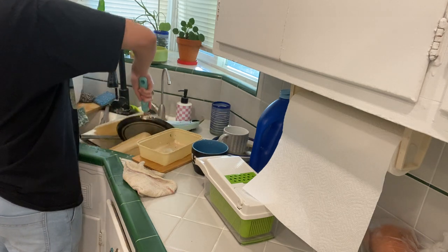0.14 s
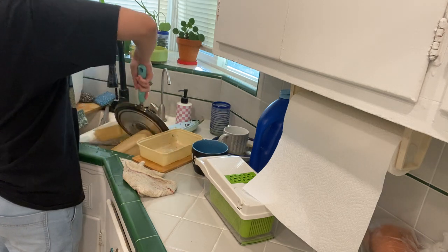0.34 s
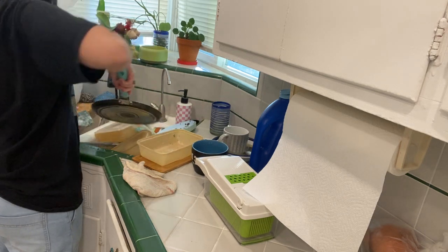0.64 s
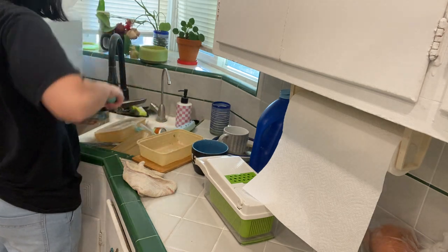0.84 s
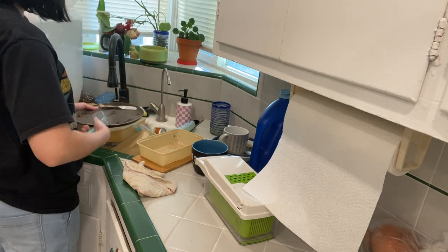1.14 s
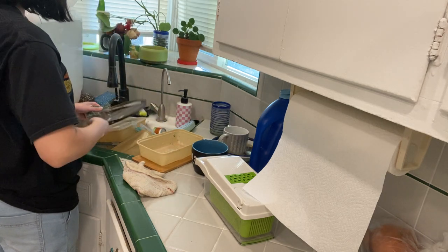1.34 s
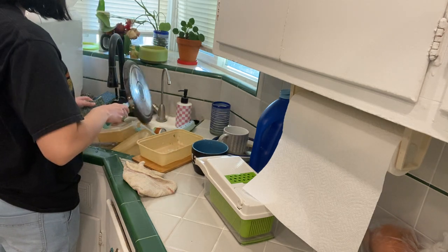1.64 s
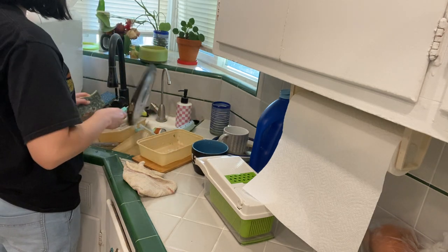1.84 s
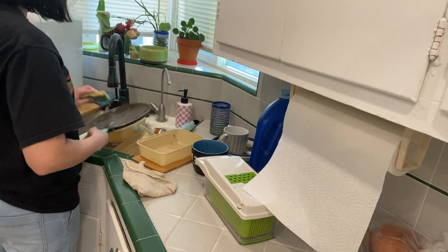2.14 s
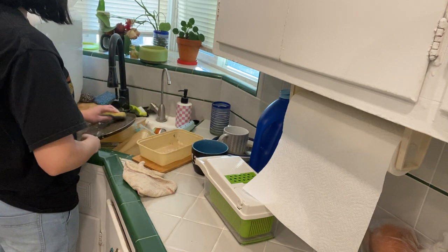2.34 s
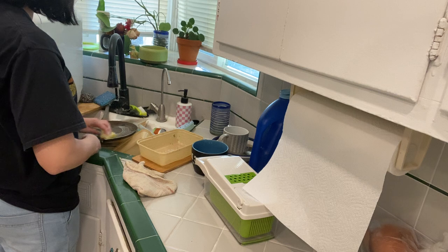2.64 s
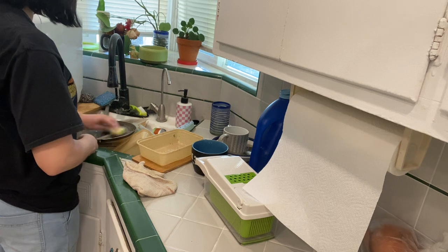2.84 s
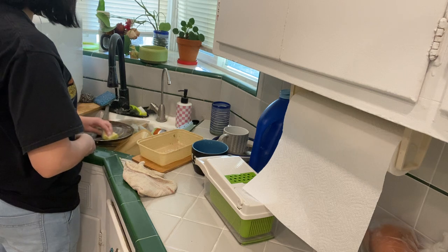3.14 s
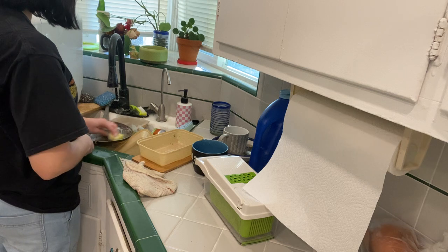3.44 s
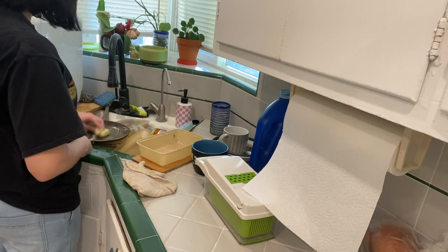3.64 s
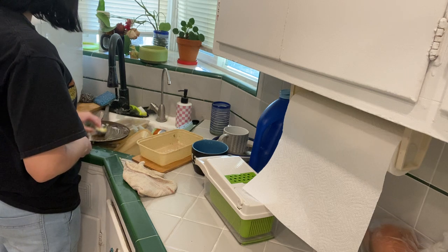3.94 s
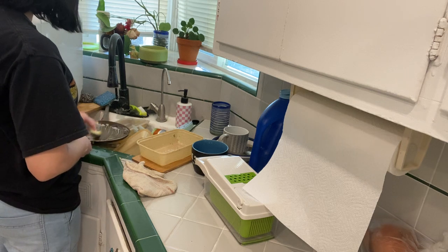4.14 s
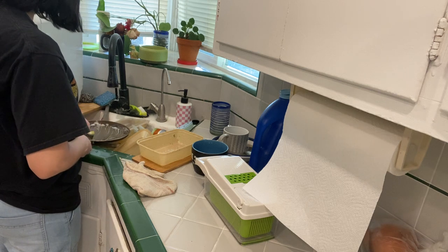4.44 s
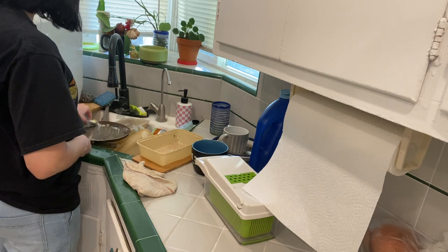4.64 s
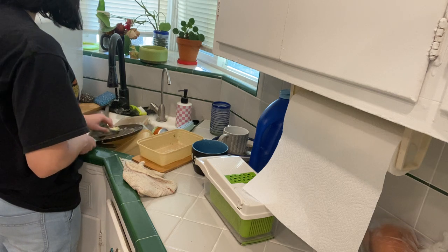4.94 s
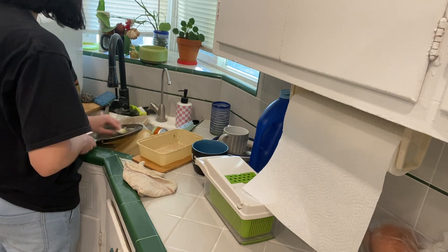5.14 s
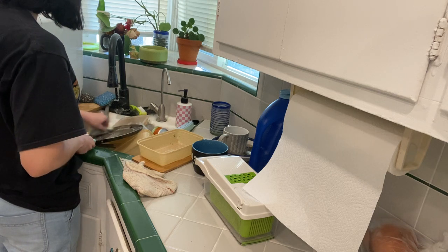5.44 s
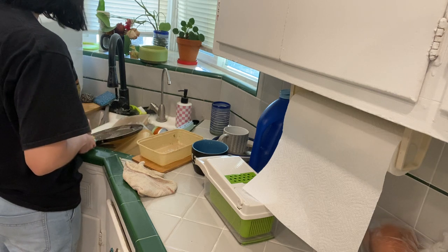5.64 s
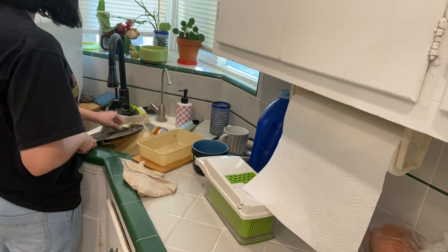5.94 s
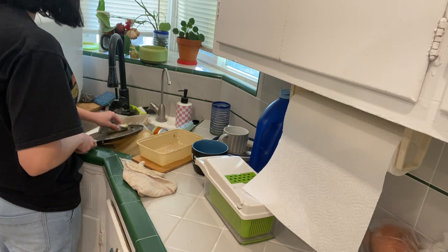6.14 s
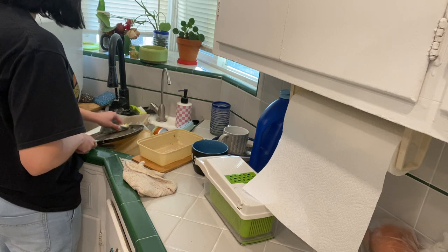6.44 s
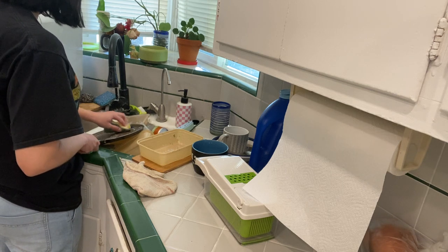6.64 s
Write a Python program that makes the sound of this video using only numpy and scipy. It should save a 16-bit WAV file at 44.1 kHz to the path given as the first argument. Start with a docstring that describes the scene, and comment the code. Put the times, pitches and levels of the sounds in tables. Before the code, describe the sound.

Loud, irregular washing-up clatter comes first: gritty scraping, a ringing dish clink, dull basin thuds and metallic pan clanks with short rings. Then the pan is held and scrubbed with a wet foamy sponge, several short hissing strokes per second over faint low rumbles. Occasional small knocks get quieter. Heard from over a metre away in a reflective kitchen, with a low steady background rush.

```python
"""In a tiled kitchen a thin round metal pan is dragged out of the sink, knocks against crockery and
the basin, and is scrubbed with a soapy sponge in short strokes.
Blows are bursts of filtered noise that set decaying modes ringing; scrapes and foam are trains of tiny
grains, and squeaks are short tones with two overtones.
A two-port phone on the counter, over a metre away, hears the contacts mostly by way of the room."""
import sys
import numpy as np
from scipy import signal
from scipy.fft import rfft, irfft
from scipy.io import wavfile
from scipy.ndimage import uniform_filter1d

SR = 44100
rng = np.random.default_rng(int(sys.argv[2]) if len(sys.argv) > 2 else 0)


def transcribe(u):
    """Save the signal u as a 16-bit wav file named by the first command-line argument.

    u: samples, shape (n,) or (channels, n), limited to [-1, 1]; the rate is SR.
    q: integer samples, one column per channel.
    """
    v = np.clip(np.atleast_2d(u).T, -1, 1)
    q = np.round(v * 32767).astype(np.int16)
    wavfile.write(sys.argv[1], SR, q)


N = 299512
T = np.arange(N) / SR  # s
HZ = np.maximum(np.arange(N // 2 + 1) * SR / N, 1)

# Blows on the pan, before the balance set in scene(); thud_db, crack_db and ring_db relative to level_db:
# start_s, level_db, thud_db, crack_db, ring_db, chatter_s, place (0 rim - 1 face)
PAN_BLOWS = [(0.814, -27, -16.5, -4, -14, 0.0096, 0.089), (0.891, -27, -0.5, -16, -9, 0.019, 0),
             (1.471, -51, -26, 14, 13.5, 0.0054, 0.26), (1.496, -48.5, -7.5, 11.5, 15.5, 0.0098, 0.19),
             (2.295, -16.5, 7, 5, -2, 0.0029, 0.21), (2.361, -23.5, 4.5, -6, -0.5, 0.0038, 0),
             (3.539, -18.5, 2, 2, -3.5, 0.003, 1)]
# Bumps against the basin and its edge, with a drip at 1.13 s and a short scrape at 1.937 s made the
# same way; before the balance set in scene(), thud_db and crack_db relative to level_db:
# start_s, level_db, thud_db, crack_db
BASIN_CONTACTS = [(0.219, -33, 12, -28), (0.31, -22, -1.5, -6), (0.396, -20, -21, 5),
                  (0.444, -32, 11.5, -4), (0.586, -43.5, 12, 2), (1.13, -57.5, -4.5, 13.5),
                  (1.601, -27.5, 12, 7.5), (1.633, -24, 11, -7.5), (1.695, -17.5, 3, -9.5),
                  (1.729, -18, 0, -12), (1.762, -13.5, -10.5, -0.5), (1.9, -21.5, -5.5, -6.5),
                  (1.937, -19.5, -7.5, 7.5), (2.528, -20.5, -2.5, -0.5), (2.572, -26.5, 5, 4),
                  (2.59, -31.5, 5, -24), (3.007, -38.5, 4.5, 7), (3.039, -31, -2.5, -6),
                  (3.356, -54.5, 11, 7), (3.464, -40, 7.5, -17), (3.951, -45, -2.5, -9),
                  (4.228, -50, 3.5, 6), (4.447, -43.5, -12, -23), (4.704, -33.5, -13, -11),
                  (4.745, -34.5, 8.5, -1.5), (4.895, -38.5, 4.5, 0), (5.502, -45, -1, -23),
                  (5.817, -52.5, 9, -11), (6.329, -60.5, 14.5, -11), (6.647, -62, 9.5, -13),
                  (6.749, -57, 16, -4)]
# Modes of the free pan: pitch_hz, rim_db (struck at the rim), face_db (struck on the face), t60_s
PAN_MODES = [(540, 1, -3, .42), (555, -3, -10, .42), (590, -7, -15, .3), (829, -16, 2, .38),
             (906, -0.5, -1, .45), (1255, -10, -12, .3), (1303, 1, -10, .4), (1580, -14, -6, .3),
             (1723, -7, -12, .38), (1843, -9, -11, .4), (2334, 0, -4, .35), (2358, -4, -8, .33),
             (2500, -14, 1, .48), (2702, -20, -1, .3), (3182, -10, -3, .28), (3400, -1, 0, .38),
             (3585, -11, -2, .28), (3881, -6, 0, .25), (3944, -7, -2, .25), (4315, -9, -8, .33),
             (4950, -12, -10, .25), (5356, -11, -11, .33), (5550, -8, -15, .22), (6067, -12, -15, .2),
             (6565, -9, -8, .33), (7381, -13, -12, .3), (7677, -10, -13, .18)]

LOW_EDGE_HZ, HIGH_EDGE_HZ = 560, 3500  # between thud, body and crack
TOP_HZ = 15000  # upper limit of the phone
PORT_LAG_S = 0.00018  # between the two ports of the phone


def contacts(table, bands, thud_db, body_db, crack_db, tick, size=4000):
    """Each contact is a first tick, then a noisy chatter that builds as it lands and dies away."""
    out, landing_s = np.zeros(N), 0.002
    low, middle, high = bands
    for s, db, thud, crack, chatter_s in table:
        chatter = np.exp(-T[:size] / max(chatter_s, 0.002)) * (1 - np.exp(-T[:size] / landing_s))
        force = rng.standard_normal(size) ** 3 * chatter  # cubing makes the peaks spiky
        force[0] += tick
        # with little crack the contact is soft and sounds woody
        parts = (
            (low, thud + thud_db),
            (softened(middle, crack), body_db),
            (high, crack + crack_db),
        )
        for band, band_db in parts:
            sound = attack_unit(signal.fftconvolve(force, band))
            add(out, s, undb(db + band_db) * sound)
    return out


def ringing(table, modes, ring_db):
    """A struck dish rings on in its modes; a blow with a weak thud moves the lowest ones less."""
    out = np.zeros((2, N))
    for s, db, thud, _, rings, _, place in table:
        struck = struck_at(modes, place)
        struck[:, 1] += min(thud, 0) * (struck[:, 0] < LOW_EDGE_HZ)
        sound = attack_unit(ring(struck, scatter_db=-1.0), size=900)
        add(out, s, undb(db + rings + ring_db) * sound)
    return out


def held_pan(ring_db, grip=0.2):
    """Every contact at the basin also rings the pan, briefly, because the hand damps it."""
    knocks = np.zeros(N)
    for s, db, *_ in BASIN_CONTACTS:
        add(knocks, s, undb([db + ring_db]))
    damped = struck_at(PAN_MODES, place=1.0) * [1, 1, grip]  # the grip shortens each decay
    # a soft contact favours the low modes
    damped[:, 1] += on_log_axis([(900, 7.5), (4000, -25.5)], damped[:, 0])
    response = attack_unit(ring(damped, scatter_db=3.0), size=900)
    return signal.fftconvolve(knocks[None], response, axes=1)[:, :N]


def drags(bands):
    """The rim catches and slips over the basin, and the slips ring the pan a little."""
    # Scrapes through the sink, rumble_db and grit_db relative to level_db:
    # start_s, length_s (before release), level_db, rumble_db, grit_db
    scrapes = [(0.0, 0.06, -28.5, -6, -18.5), (0.06, 0.055, -23.5, -10.5, -8.5),
               (0.109, 0.3, -33.5, -3, -13.5), (0.336, 0.055, -28, -9, 0), (0.408, 0.15, -34, -6, -13.5),
               (0.793, 0.059, -31.5, -3.5, -10.5), (0.859, 0.053, -32, -14, -13.5),
               (1.444, 0.12, -48, -3.5, -2), (1.605, 0.089, -32, -4, -5), (1.692, 0.14, -26, -2.5, -3.5),
               (1.902, 0.094, -37.5, -10, -3.5)]
    slips = grains(per_s=450, spread_db=4.0)
    rumble, body, grit = (unit(signal.fftconvolve(slips, band)[:N]) for band in bands)
    pan_response = ring(struck_at(PAN_MODES, place=0.5), scatter_db=3)[0]
    pan = undb(-10.5) * unit(signal.fftconvolve(slips, pan_response)[:N])
    out = np.zeros(N)
    for s, length, db, rumble_db, grit_db in scrapes:
        speed = gesture(s, length, attack_s=0.02, release_s=0.017)
        # a scrape with little grit is duller
        scrape = unit(softened(body, grit_db)) + pan
        scrape += undb(rumble_db) * rumble + undb(grit_db) * grit
        out += speed * undb(db) * scrape
    return out


def squeaks(waver_hz=18):
    """Brief, unsteady stick-slip of metal on a wet dish; the pitch sags as the rim slows."""
    # Squeaks of the wet rim: start_s, length_s (before release), pitch_hz (at the start), level_db
    slipping = [(0.0, .035, 1780, -38.5), (0.035, 0.022, 747, -29), (0.08, 0.021, 751, -19.5),
                (1.495, 0.27, 1860, -39.5)]
    sag_per_s = 0.2  # fraction of the starting pitch
    out = np.zeros(N)
    waver = unit(uniform_filter1d(rng.standard_normal(N), size=60))
    for s, length, hz, db in slipping:
        grip = gesture(s, length, attack_s=0.0076, release_s=0.004)
        on = grip > 0
        pitch_hz = hz * (1 - sag_per_s * (T[on] - s)) + waver_hz * waver[on]
        phase = 2 * np.pi * np.cumsum(pitch_hz) / SR
        # partials fade towards the treble
        tone = sum(np.sin(k * phase) / k / (1 + (k * hz / 3500) ** 4) for k in range(1, 4))
        out[on] += tone * grip[on] * undb(db)
    return out


def sponge():
    """Foam and fibres hiss with each stroke while the held pan rumbles under the pressure."""
    # Strokes: start_s, length_s (before release), hiss_db (foam), pressure_db (rumble of the pan)
    strokes = [(1.205, 0.032, -64, -70.5), (1.27, 0.083, -71.5, -84), (2.8, 0.17, -54.5, -70),
               (2.974, 0.16, -57, -44.5), (3.169, 0.15, -55.5, -58), (3.372, 0.16, -54, -49.5),
               (3.765, 0.14, -53.5, -56.5), (3.926, 0.11, -50.5, -54.5), (4.068, 0.12, -55, -58.5),
               (4.232, 0.084, -54.5, -67), (4.345, 0.1, -56.5, -61.5), (4.478, 0.15, -54.5, -60.5),
               (4.673, 0.18, -53.5, -44.5), (4.979, 0.16, -61, -61), (5.155, 0.092, -57, -80),
               (5.25, 0.076, -53, -68), (5.32, 0.22, -57.5, -57), (5.526, 0.13, -57, -66.5),
               (5.695, 0.12, -55, -70.5), (5.829, .1, -56.5, -72), (5.941, 0.11, -55.5, -60.5),
               (6.105, 0.096, -54.5, -60), (6.228, 0.079, -54.5, -57), (6.362, 0.079, -55, -64),
               (6.473, 0.085, -58, -62.5), (6.61, 0.12, -63.5, -66)]
    # Broad colour of the foam: frequency_hz, gain_db
    foam_colour = [(500, -3), (1000, -4), (1600, -2), (2500, 1), (4000, -4.5), (5500, 1), (7800, 0),
                   (9500, -13.5), (12500, 1.5), (14500, -8), (16000, -5)]
    # Resonances added to the hiss: frequency_hz, width_hz, gain_db (relative to the broad colour)
    foam_peaks = [(3336, 164, 11), (3880, 80, -4.5), (4230, 430, 5), (6470, 120, -3.5), (7830, 500, 0.5),
                  (9200, 720, 14)]
    peaks = sum(undb(db) / (1 + (2 * (HZ - hz) / width) ** 2) for hz, width, db in foam_peaks)
    foam_gain = undb(on_log_axis(foam_colour, HZ)) * (1 + peaks)
    hiss = unit(shape(grains(per_s=3600, spread_db=-1.0), foam_gain))
    # colour of the flexing pan: frequency_hz, gain_db
    flexing = [(40, -12.5), (110, -11), (170, -5), (195, -5.0), (228, 2), (290, -12.5),
               (420, -8.5), (510, 0.0), (620, -13.0), (830, -9.5), (1600, -21.5), (5000, -77.0)]
    rumble = unit(shape(rng.standard_normal(N), undb(on_log_axis(flexing, HZ))))
    out = np.zeros(N)
    for s, length, hiss_db, pressure_db in strokes:
        stroke = gesture(s, length, attack_s=0.025, release_s=0.035)
        out += stroke * (undb(hiss_db) * hiss + undb(pressure_db) * rumble)
    return out


def booming(boom_db, pan_boom_db):
    """The thud of each basin contact, and of each blow on the pan, sets the hollow basin booming."""
    # Modes of the basin and counter: pitch_hz, level_db, t60_s
    basin_modes = [(128.8, -2.5, 0.27), (157, 9.5, 0.31), (176.3, -12, 0.093), (217.6, -10, 0.72),
                   (251, 4, 0.15), (280, -6, 0.39), (334.8, 4.5, 0.16), (392, 0.5, 0.39), (491, 8.5, 0.42)]
    out = np.zeros((2, N))
    for table, coupling_db in ((BASIN_CONTACTS, boom_db), (PAN_BLOWS, pan_boom_db)):
        for s, db, thud, *_ in table:
            boom = attack_unit(ring(basin_modes, scatter_db=3.5, size=11000), size=900)
            add(out, s, undb(db + thud + coupling_db) * boom)
    return out


def kitchen(x, early_db, tail_db, size=36000):
    """Direct sound, weakest in the treble, reaches the left port first; tiles answer, the room rings."""
    # Decay of the room: frequency_hz, t60_s
    room_decay = [(80, 0.46), (250, 0.39), (1000, 0.48), (3000, 0.5), (7000, 0.42), (14000, 0.17)]
    t = T[:size]
    f, frames, z = signal.stft(rng.standard_normal((2, size)), SR, nperseg=256)
    decay = np.exp(-np.log(1000) * frames / on_log_axis(room_decay, f + 1)[:, None])
    tail = signal.istft(z * decay, SR)[1][:, :size] * np.clip(t / 0.00093, 0, 1)
    # sparse early reflections
    early = rng.standard_normal((2, size)) * (rng.random((2, size)) < 0.04)
    early *= np.exp(-t / 0.007) * (t > 0.001)
    reflections = undb(tail_db) * unit(tail) + undb(early_db) * unit(early)
    echoes = rfft(reflections / np.sqrt(size), N)
    # a diffuse field carries the same power in every band
    power = np.abs(echoes) ** 2
    mid, side = echoes * np.sqrt(power.mean() / uniform_filter1d(power, size=400, axis=1))
    # long waves reach both ports alike
    apart = HZ ** 2 / (HZ ** 2 + 380 ** 2)
    room = mid * np.sqrt(1 - apart / 2) + np.array([[1], [-1]]) * side * np.sqrt(apart / 2)
    direct = undb(on_log_axis([(200, -2.0), (2000, -4.5), (8000, -29.5)], HZ))
    lag = np.exp(-2j * np.pi * HZ * np.array([[0], [PORT_LAG_S]]))
    response = irfft((direct + room) * lag, N)[:, :size]
    return signal.fftconvolve(x[None], response, axes=1)[:, :N]


def room_tone():
    """The faint steady rush of the house is coloured noise, partly different at the two ports."""
    # Colour of the rush: frequency_hz, gain_db
    house_colour = [(15, -29), (25, -7.5), (60, 13), (110, -9.5), (170, -10.5), (300, -10.5), (1000, -13),
                    (3000, -13), (9000, -16.5), (14000, -34), (15500, -45.5)]
    gain = undb(on_log_axis(house_colour, HZ))
    mid, side = (unit(shape(rng.standard_normal(N), gain)) for _ in range(2))
    return undb(-65) * (mid + 0.4 * side * np.array([[1], [-1]]))


def contact_bands():
    """Responses of a contact in three ranges: thud, body and crack."""
    # Colour of a blow: frequency_hz, gain_db
    blow_colour = [(25, -42.5), (50, -17.5), (75, -10.5), (105, -18), (150, -2.5), (260, -1.5), (400, -0.5),
                   (520, 4.5), (640, -2), (820, -0.5), (1100, -4.5), (1500, -3.5), (2200, -7), (4000, -6),
                   (5600, -11.5), (8200, -11.5), (12600, -20.5), (15500, -29)]
    colour = undb(on_log_axis(blow_colour, HZ))
    low = 1 / (1 + (HZ / LOW_EDGE_HZ) ** 6)
    high = 1 / (1 + (HIGH_EDGE_HZ / HZ) ** 6)
    return [causal(colour * np.sqrt(share)) for share in (low, (1 - low) * (1 - high), high)]


def softened(body, crack_db):
    """The less crack a contact has, the lower its middle range rolls off."""
    # the corner is 3000 Hz at 0 dB of crack and follows 0.51 of the crack's decibels
    corner_hz = np.clip(3000 * undb(0.51 * crack_db), LOW_EDGE_HZ, TOP_HZ)
    return signal.lfilter(*signal.butter(1, corner_hz, fs=SR), body)


def struck_at(modes, place):
    """The place of a blow, between rim and face, decides how strongly each mode answers."""
    hz, rim_db, face_db, t60 = np.transpose(modes)
    return np.column_stack([hz, rim_db + np.clip(place, 0, 1) * (face_db - rim_db), t60])


def ring(modes, scatter_db, waver=0.47, size=20000):
    """Decaying modes at the two ports; reflections shift each mode's phase and make it waver."""
    hz, db, t60 = np.transpose(modes)[:, :, None]
    t, chance = T[:size], rng.standard_normal((len(modes), 3, 1))
    # slow complex noise, one random point every 400 samples
    knots = rng.standard_normal((len(modes), size // 400, 2)) @ np.array([1, 1j])
    reflections = signal.resample(knots, size, axis=1)
    start = undb(db + scatter_db * chance[:, 0]) * np.exp(2j * np.pi * chance[:, 1])
    decaying = np.exp((2j * np.pi * hz - np.log(1000) / t60) * t)
    waves = start * (1 + waver * reflections) * decaying
    # opposite phase turns at the two ports
    turn = np.exp(0.7j * np.minimum(hz / 900, 1) * chance[:, 2] + 1j * np.pi * hz * PORT_LAG_S)
    build_s = 0.0019
    return (np.hstack([turn, 1 / turn]).T @ waves).imag * (1 - np.exp(-t / build_s))


def grains(per_s, spread_db):
    """Tiny slips or bursts at random moments; a large positive spread makes a few stand out."""
    size = undb(spread_db * np.minimum(rng.exponential(size=N), 4))
    return unit((rng.random(N) < per_s / SR) * size * np.sign(rng.standard_normal(N)))


def gesture(start, length, attack_s, release_s):
    """A movement of the hand: it gathers speed smoothly, holds, and comes to rest after its length."""
    rise = np.clip((T - start) / attack_s, 0, 1)
    fall = np.clip(1 - (T - start - length) / release_s, 0, 1)
    return rise * rise * (3 - 2 * rise) * fall


def blows(table):
    """Time, level, thud, crack and chatter of each blow on a dish."""
    return [(s, db, thud, crack, chatter_s) for s, db, thud, crack, _, chatter_s, _ in table]


def undb(db):
    """Decibels to gain."""
    return 10 ** (np.asarray(db) / 20)


def unit(x):
    """Scale to rms 1."""
    return x / np.sqrt(np.mean(x ** 2) + 1e-20)


def attack_unit(x, size=440):
    """Scale so that the first samples have rms 1."""
    return x / np.sqrt(np.mean(x[..., :size] ** 2))


def on_log_axis(points, hz):
    """Read (Hz, value) points on a logarithmic frequency axis."""
    f, value = np.transpose(points)
    return np.interp(np.log(hz), np.log(f), value)


def shape(x, gain):
    """Filter by a gain for each frequency."""
    return irfft(rfft(x) * gain, N)


def causal(gain, size=1024):
    """The minimum-phase impulse response with this gain, from the cepstrum, cut to size."""
    cepstrum = irfft(np.log(gain + 1e-6), N)
    cepstrum[1:N // 2] *= 2
    cepstrum[N // 2:] = 0
    return irfft(np.exp(rfft(cepstrum)), N)[:size]


def add(out, s, x):
    """Mix a sound in at a time in seconds."""
    i = max(int(s * SR), 0)
    out[..., i:i + x.shape[-1]] += x[..., :max(N - i, 0)]


def scene():
    """Contacts, scrapes and scrubbing fill the room; pan, crockery and basin ring on."""
    # Clinks of crockery, before the balance below; thud_db, crack_db and ring_db relative to level_db:
    # start_s, level_db, thud_db, crack_db, ring_db, chatter_s, place (0 rim - 1 face)
    clinks = [(0.183, -20.5, -1.5, -0.5, 7, 0.011, 0), (0.202, -26, 6.5, -17, -11, 0.0042, 0),
              (3.057, -47.5, -24, 5.5, 6.5, 0.0031, 0.39), (4.831, -39.5, 9, 7, 8, 0.007, 0.79)]
    # Modes of the crockery: pitch_hz, rim_db (struck at the rim), face_db (on the face), t60_s
    crockery_modes = [(1110, -1, -12, .22), (2002, 7.5, -14, .16), (2536, 3, -20, .48),
                      (2610, -4, -20, .18), (3330, -14, 7, .28), (3700, -18, -4, .22), (4490, 1, -4, .3),
                      (4610, -10, -5, .18), (5050, -18, -2, .22), (6855, -1, -8, .14)]
    bands = contact_bands()
    pan = contacts(blows(PAN_BLOWS), bands, thud_db=-3.5, body_db=0.5, crack_db=-0.5, tick=11)
    dishes = contacts(blows(clinks), bands, thud_db=-3.0, body_db=6, crack_db=-1, tick=11)
    touches = [(*touch, 0.0096) for touch in BASIN_CONTACTS]  # all share one chatter time, s
    basin = contacts(touches, bands, thud_db=-2.5, body_db=-1, crack_db=-11.0, tick=5.3)
    dry_noises = pan + dishes + basin + drags(bands) + squeaks() + sponge()
    noises = kitchen(dry_noises, early_db=0, tail_db=-3.5)
    rings = ringing(PAN_BLOWS, PAN_MODES, ring_db=4.5)
    rings += ringing(clinks, crockery_modes, ring_db=-2.5)
    rings += booming(boom_db=-11.5, pan_boom_db=-11.5)
    rings += held_pan(ring_db=-22)
    # left over right: the bass is a little stronger on the right, the range near 500 Hz on the left
    balance = [(120, -2.0), (280, -1.0), (500, 3.0), (2000, 0.25), (10000, 0.5)]
    balance_db = on_log_axis(balance, HZ)
    return shape(noises + rings + room_tone(), undb(np.array([balance_db, -balance_db]) / 2))


def record(dry):
    """The phone clips, is deaf in a narrow treble band and cuts the deepest bass and the top."""
    notch = signal.butter(3, [9750, 11250], "bandstop", fs=SR, output="sos")
    rumble = signal.butter(2, 40, "highpass", fs=SR, output="sos")
    top = signal.ellip(8, 0.2, 70, TOP_HZ, fs=SR, output="sos")
    return signal.sosfilt(np.vstack([notch, rumble, top]), np.clip(dry, -1, 1))


dry = scene()
out = record(dry)
transcribe(out)
```